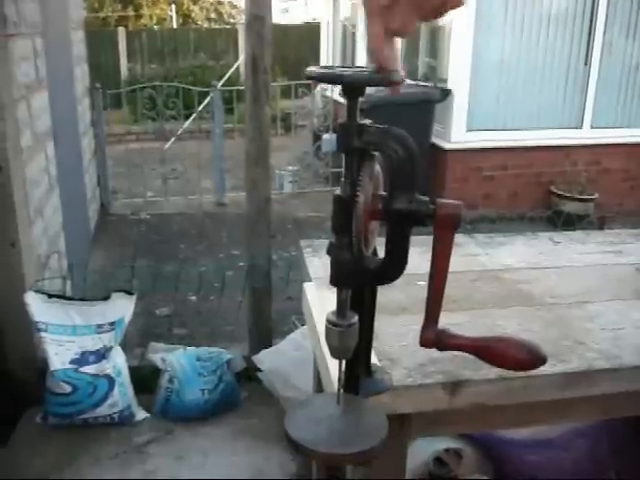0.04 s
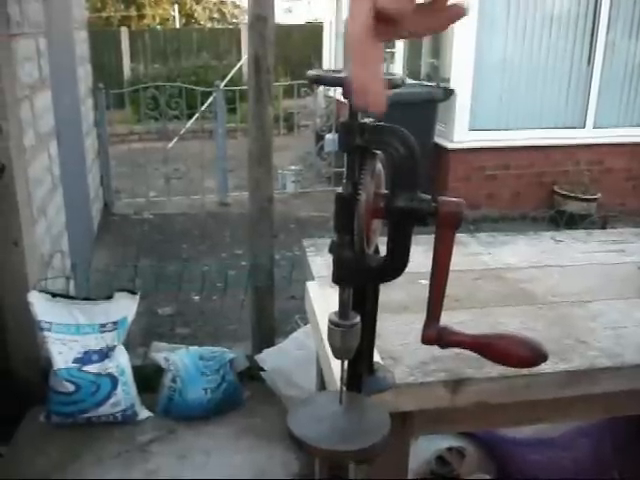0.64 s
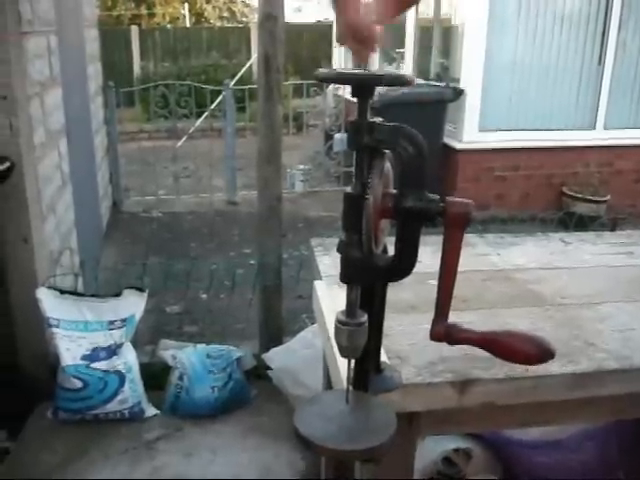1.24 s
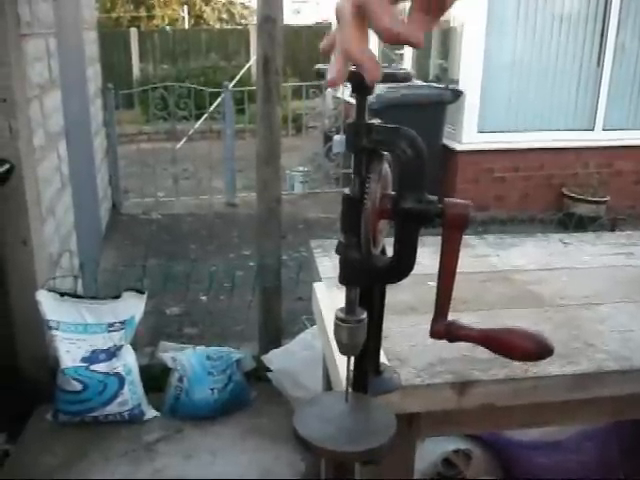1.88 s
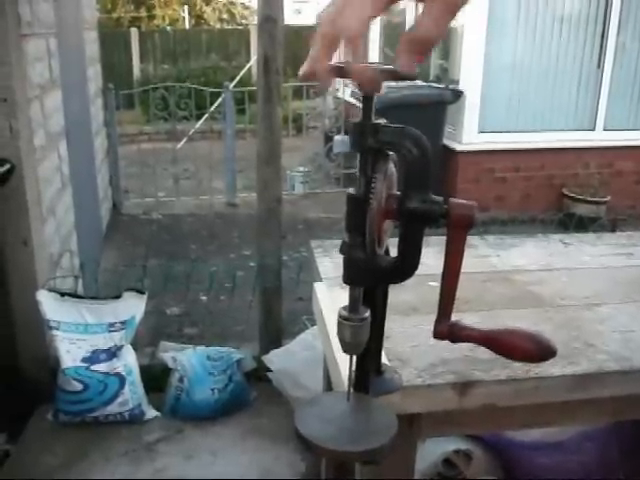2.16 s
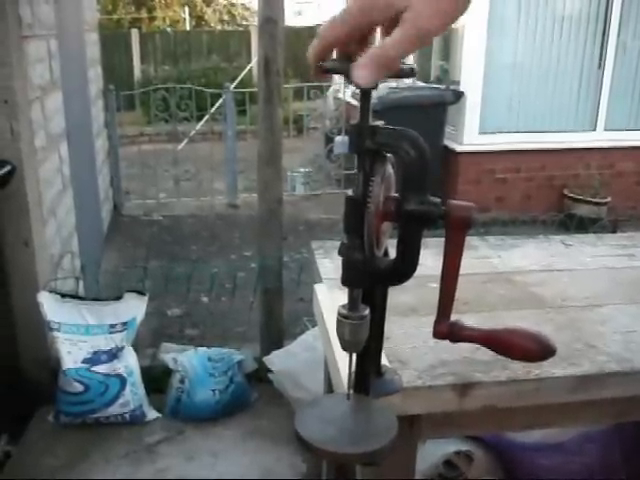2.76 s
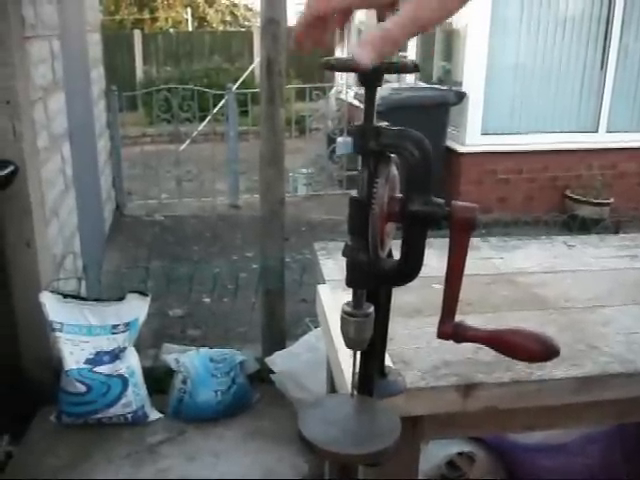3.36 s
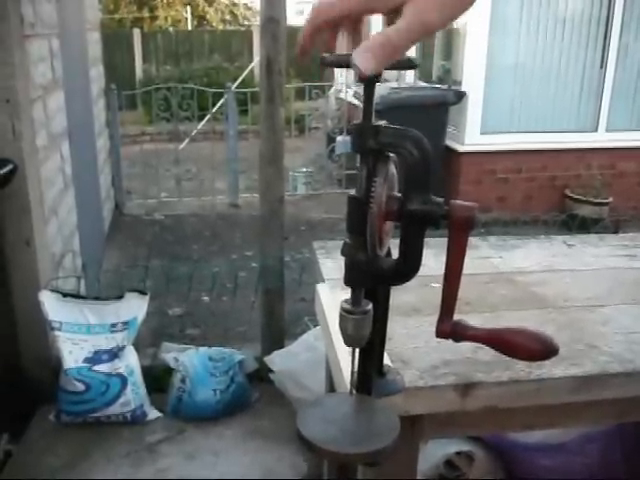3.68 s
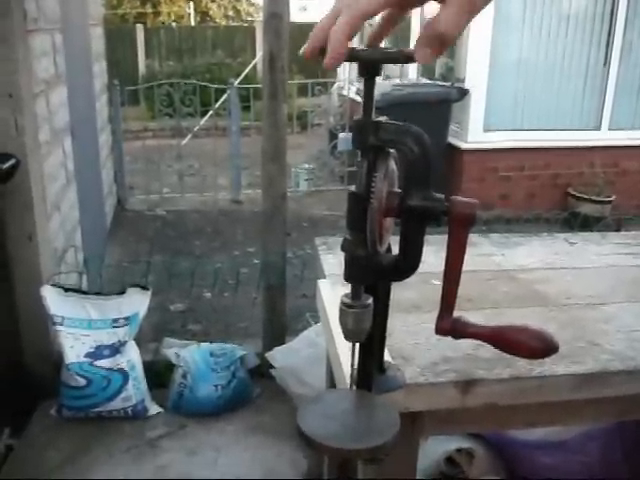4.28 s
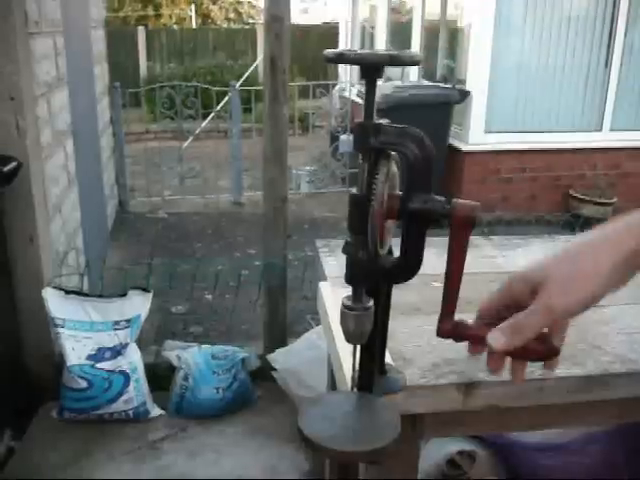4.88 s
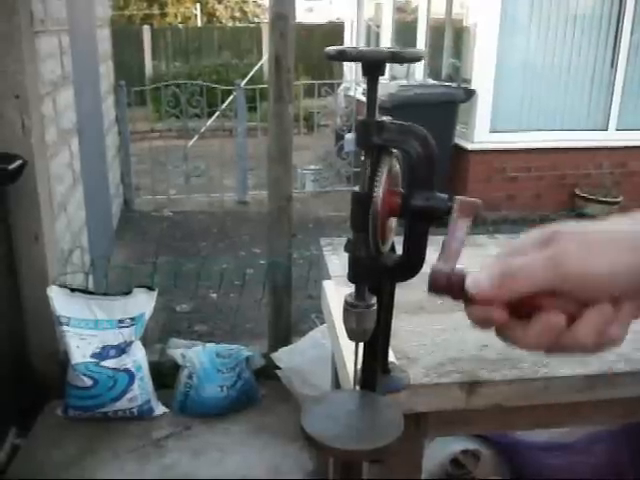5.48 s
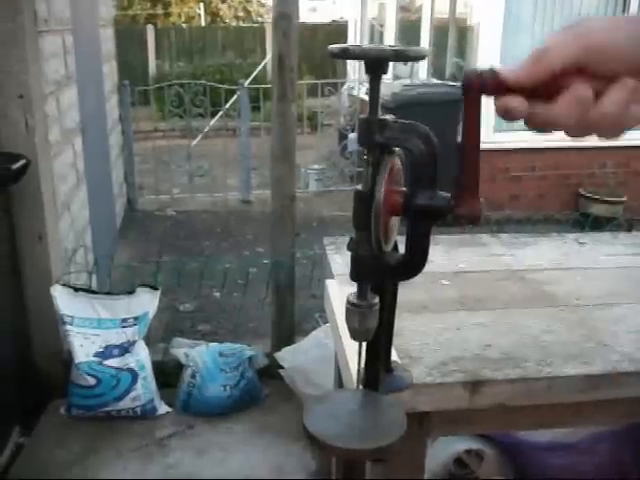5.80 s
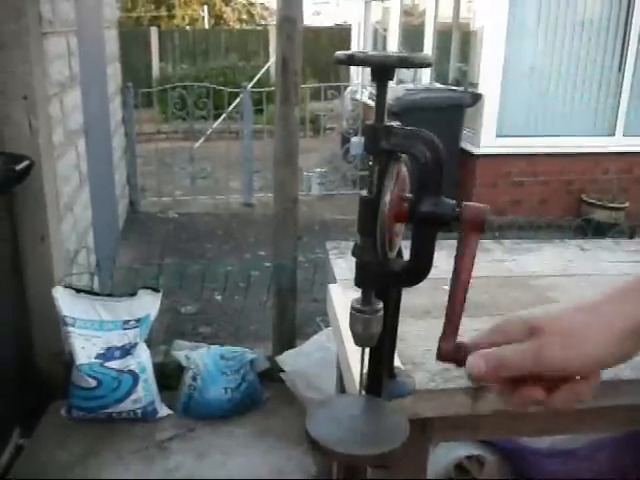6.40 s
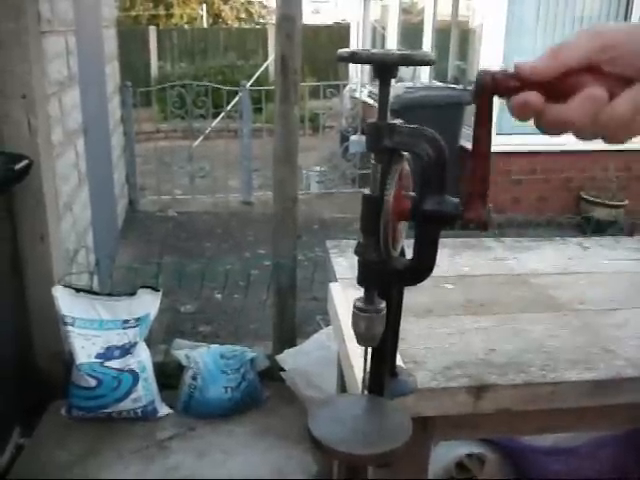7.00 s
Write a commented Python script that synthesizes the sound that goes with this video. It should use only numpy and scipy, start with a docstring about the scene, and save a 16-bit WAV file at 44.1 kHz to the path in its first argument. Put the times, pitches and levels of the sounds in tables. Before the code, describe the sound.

A hand-cranked bench drill rubs, knocks and ticks quietly, then its gears whirr, over a distant engine, traffic and hiss.

```python
"""A hand-cranked bench drill, worked in a doorway onto a patio. Fingers spin the feed wheel, whose screw
rubs and knocks in the iron frame while a steel pawl ticks; then the crank turns and the gears whirr.
Each part is a set of ringing modes, struck by single hits or a stream of tiny contacts. Behind it sit
one far engine, a wash of traffic, a low breeze and, at the end, a faint hoot. It is all heard through
a small camera with hiss and a low sample rate."""
import sys
import numpy as np
from scipy import signal
from scipy.fft import rfft, irfft
from scipy.io import wavfile

SR = 44100
rng = np.random.default_rng(int(sys.argv[2]) if len(sys.argv) > 2 else 0)


def unload_audio(sound):
    """Save the sound as a 16-bit wav file, at the path given as the first command line argument."""
    columns = np.transpose(np.atleast_2d(sound))
    # keep every value between -1 and 1, then stretch to whole-number steps
    steps = np.round(np.clip(columns, -1, 1) * 32767)
    wavfile.write(sys.argv[1], SR, steps.astype(np.int16))


N = 314874

# Finger flicks on the feed wheel. Each row: start in seconds, peak level of the rub in dB.
WHEEL_FLICKS = [(-.03, -38), (.22, -42.5), (.5, -45), (.8, -47.5), (2.12, -49), (2.35, -47), (2.72, -48.5),
                (3.65, -54), (3.95, -55)]
FLICK_RISE_S, COAST_DB_PER_S = 0.034, 29


def wheel_spin():
    """The rub's envelope: each flick brings the feed wheel up to speed, then it coasts down."""
    t = clock()
    flicks = []
    for s, db in WHEEL_FLICKS:
        attack = np.clip((t - s) / FLICK_RISE_S, 0, 1)
        coasting_s = np.maximum(t - s - FLICK_RISE_S, 0)
        flicks.append(attack * from_db(db - COAST_DB_PER_S * coasting_s))
    return np.max(flicks, axis=0)


# The ring of the cast frame. Each row: pitch in Hz, relative level in dB, t60 in seconds.
FRAME_MODES = [(197, -13, 0.045), (244, -10, 0.12), (319, -7.5, 0.076), (370, -6, 0.05), (434, -1, 0.051),
               (508, -2.5, 0.029), (630, -3, 0.058), (780.5, -1.5, 0.085), (864, -4.5, 0.043),
               (1031, 0, 0.04), (1108, 0, 0.015), (1347, -4.5, 0.022), (1750, -12, 0.036),
               (2495, -30, .012), (3000, -27, .015), (3600, -30, 0.014)]


def feed_rub():
    """The dry thread scrapes dully through the frame and drones in its lowest modes."""
    scrape = cut(ring(grains(per_s=900, spread_db=2.5), FRAME_MODES), 140, "high", order=4)
    scrape = cut(scrape, 370, "low", order=1)   # the fingers damp the higher modes
    drone = cut(rng.standard_normal(N), [185, 265], "band")
    rub = from_db(-3.0) * rms_one(scrape) + from_db(-5.0) * rms_one(drone)
    return wheel_spin() * from_db(0.64 * drift(21.8)) * rub


def contact(bass_hz, treble_hz, chatter_t60, push_db):
    """A push followed by chatter of the loose screw; softer contacts get a lower treble corner."""
    force = burst(chatter_t60)
    force[0] += from_db(push_db)
    return cut(cut(force, treble_hz, "low"), bass_hz, "high")


# Knocks of the feed screw. Each row: start in seconds, knock force in dB, its treble corner in Hz,
# thud force in dB.
SCREW_KNOCKS = [(1.2158, -24, 1795, -21), (1.273, -31, 1150, -42), (1.448, -28.5, 900, -38),
                (1.602, -31.5, 1050, -34.5), (1.675, -33, 700, -40), (1.721, -24, 1050, -30),
                (1.775, -33, 900, -38), (2.003, -28.5, 1700, -27), (2.055, -28, 1400, -50),
                (2.301, -24.5, 1384, -27.5), (2.351, -29, 1250, -41), (2.638, -33, 500, -37),
                (2.797, -30.5, 800, -38), (3.089, -36, 1300, -50), (3.127, -30.5, 1450, -40),
                (3.666, -31.5, 1450, -50)]
SETTLE_S = .011   # from knock to thud


def feed_knocks():
    """The screw knocks in its slack against the frame and settles with a dull thud."""
    force = np.zeros(N)
    for s, knock_db, treble_hz, thud_db in SCREW_KNOCKS:
        knock = contact(bass_hz=0.47 * treble_hz, treble_hz=treble_hz, chatter_t60=0.09, push_db=-3.5)
        thud = contact(bass_hz=202, treble_hz=593, chatter_t60=0.12, push_db=-6)
        add(force, s, from_db(knock_db) * knock)
        add(force, s + SETTLE_S, from_db(thud_db) * thud)
    return from_db(1.5) * ring(force, FRAME_MODES, flip=False)


# Clear ticks. Each row: start in seconds, force on the pawl in dB, force on the big wheel in dB.
PAWL_TICKS = [(0.019, -38, -34.5), (0.38, -35.5, -34), (1.2116, -36.5, -39), (1.501, -40, -40.5),
              (1.5984, -35.5, -38), (2.6835, -27.5, -37), (2.9983, -18.5, -33.5), (3.3712, -28.5, -40.5),
              (4.0455, -36.5, -51), (5.660, -35.5, -39), (6.0917, -26, -39), (6.4605, -25, -45),
              (6.4645, -29.5, -32.5), (6.5016, -29.5, -43), (6.5415, -33, -44), (6.570, -33, -47),
              (6.8916, -27, -35)]
# The bright ping of the steel pawl. Each row: pitch in Hz, relative level in dB, t60 in seconds.
PAWL_MODES = [(2680, -13, 0.074), (2770, -5, 0.016), (3200, 6, 0.013), (3450, -5, 0.0096),
              (3627, -2.5, 0.014), (3792, -1.5, 0.013), (4190, -6.5, 0.021), (4490, -2, .025)]
# The body of the big gear wheel. Each row: pitch in Hz, relative level in dB, t60 in seconds.
GEAR_MODES = [(549, -3, 0.039), (680, -1, 0.024), (738, -1, 0.052), (824, 2, 0.016), (959, -3.5, 0.045),
              (1085, -3, 0.047), (1366, -10, 0.068), (1450, -6.5, 0.023), (1780, -7.5, 0.014),
              (2390, -6, 0.0091), (2800, -26, 0.03), (3055, -15, 0.055), (3120, -11, 0.013),
              (3520, -19, 0.044), (4380, -17.5, 0.049)]


def pawl():
    """The pawl snaps over a tooth, pings and jolts the big wheel. On running gears it jingles lightly."""
    snap, jolt = np.zeros((2, N))
    for s, pawl_db, wheel_db in PAWL_TICKS:
        add(snap, s, from_db([pawl_db]))
        add(jolt, s, from_db([wheel_db]))
    jingle = from_db(TEETH_DB + 1 + cranking_db()) * grains(per_s=24, spread_db=1.5)
    # so small a part radiates no bass
    ping = cut(ring(snap + jingle, PAWL_MODES, flip=False), [2660, 3980], "band")
    thud = cut(ring(jolt, GEAR_MODES, flip=False), [550, 2100], "band")
    return doorway(from_db(3.5) * ping + from_db(6.5) * thud, tail_db=0.3, tail_t60=0.071)


CRANK_START_S, CRANK_FADE_IN_S = 5.12, .3
CRANK_TOP_S, CRANK_RISE_DB_PER_S, CRANK_FALL_DB_PER_S = 6.487, 9, 16.5


def cranking_db():
    """Level of the running gears against their top: the hand sets off, gathers speed and slows."""
    t = clock()
    setting_off = np.clip((t - CRANK_START_S) / CRANK_FADE_IN_S, 1e-4, 1)
    rising_db = CRANK_RISE_DB_PER_S * (t - CRANK_TOP_S)
    falling_db = CRANK_FALL_DB_PER_S * (CRANK_TOP_S - t)
    return 20 * np.log10(setting_off) + np.minimum(rising_db, falling_db)


# The gears bind twice near full speed. Each row: centre in seconds, teeth boost in dB, bearing boost in dB.
GEAR_BINDS = [(6.022, 9, 5), (6.42, 4.5, 8)]
TEETH_DB, BEARING_DB = -43, -48.5   # at full speed, before the boosts


def gears():
    """Rough teeth rattle the big wheel and sizzle; the bearing rumbles under load. Binds swell both."""
    teeth_db = TEETH_DB + cranking_db()
    bearing_db = BEARING_DB + cranking_db()
    for s, teeth_boost_db, bearing_boost_db in GEAR_BINDS:
        teeth_db += teeth_boost_db * swell(s, half_width_s=0.042)
        bearing_db += bearing_boost_db * swell(s, half_width_s=0.03)
    whirr = rms_one(cut(ring(grains(per_s=740, spread_db=5), GEAR_MODES), 410, "high"))
    sizzle = rms_one(cut(grains(per_s=350, spread_db=12.0), [3080, 3680], "band"))
    teeth = whirr + from_db(-17.0) * sizzle
    bearing = rms_one(cut(rng.standard_normal(N), [200, 420], "band"))
    return from_db(teeth_db + 1.4 * drift(25)) * teeth + from_db(bearing_db) * bearing


# The direct path and the doorway's bounces. Each row: delay in seconds, relative level in dB.
DOORWAY_PATHS = [(0, -8), (.00179, -7), (.00532, 0), (.00885, -11)]


def doorway(x, tail_db, tail_t60):
    """A tight space: a few close reflections and a short scatter."""
    response = from_db(tail_db) * burst(tail_t60)
    for delay, db in DOORWAY_PATHS:
        add(response, delay, from_db([db]))
    return signal.fftconvolve(x, response / np.sqrt(np.sum(response ** 2)))[:N]


# The engine pulls away, eases off and gathers speed again.
# Each row: time in seconds, firing rate in Hz, overall gain in dB.
ENGINE_CURVE = [(0, 29.8, -40), (.75, 29.63, -46.5), (1.19, 42.8, -42), (1.8, 42.16, -39.5),
                (2.3, 41.6, -44), (2.75, 41.1, -53.5), (3.6, 37.98, -49), (4.25, 36.37, -54),
                (5.2, 41.67, -50), (5.9, 44.8, -48.5), (6.25, 46.1, -49), (7.14, 45.74, -51)]
# Its tone: the relative level in dB of each of the first four firing orders.
ENGINE_ORDERS_DB = [-4, -7.5, -17, -20.5]


def engine(waver_db):
    """A far engine drones: only its lowest firing orders carry, each wavering in level."""
    firing_hz, gain_db = in_time(ENGINE_CURVE)
    phase = 2 * np.pi * np.cumsum(firing_hz) / SR
    drone = 0
    for order, db in enumerate(ENGINE_ORDERS_DB, start=1):
        level = from_db(db + waver_db * drift(6))
        drone += level * np.sin(order * phase + 2 * np.pi * rng.random())
    return from_db(gain_db) * np.sqrt(2) * drone


# The colour of the traffic. Each row: frequency in Hz, relative spectral density in dB.
TRAFFIC_SPECTRUM = [(20, -26), (40, -5), (65, -12), (100, -28), (140, -19), (190, -12), (245, -7.5),
                    (380, -14.5), (560, -8.5), (750, -9.5), (1000, -13), (1250, -20), (2000, -29.5),
                    (3500, -35.5)]
# Its fader. Each row: time in seconds, level in dB.
TRAFFIC_LEVEL = [(0, -45), (5.2, -46.5), (7.14, -47)]


def traffic():
    """Distant traffic blends into a dark, slightly wavering wash."""
    level_db, = in_time(TRAFFIC_LEVEL)
    return from_db(level_db + 0.58 * drift(8.3)) * noise(TRAFFIC_SPECTRUM)


# The breeze dies down. Each row: time in seconds, level in dB.
BREEZE_LEVEL = [(0, -43.5), (.9, -46), (1.3, -46.5), (2.6, -50), (7.14, -53)]


def breeze():
    """Moving air makes a deep rumble."""
    level_db, = in_time(BREEZE_LEVEL)
    rumble = cut(cut(rng.standard_normal(N), 75.4, "low"), 23.5, "high")
    return from_db(level_db) * rms_one(rumble)


def hoot(start_s, rise_s, hz, glide_hz_per_s, db):
    """A faint, far tone fades in and glides slowly upwards."""
    since = np.maximum(clock() - start_s, 0)
    phase = 2 * np.pi * np.cumsum(hz + glide_hz_per_s * since) / SR
    return from_db(db) * np.minimum(since / rise_s, 1) * np.sqrt(2) * np.sin(phase)


def ring(force, modes, flip=True):
    """One force rings a body's modes in alternating polarity; flip=False gives a sharper attack."""
    out = 0
    for k, (hz, db, t60) in enumerate(modes):
        decay = from_db(-60 / (t60 * SR))
        angle = 2 * np.pi * hz / SR
        sign = -1 if flip and k % 2 else 1
        feedback = [1, -2 * decay * np.cos(angle), decay * decay]
        out += sign * from_db(db) * signal.lfilter([0, np.sin(angle)], feedback, force + 1e-18)
    return out / np.sqrt(sum(from_db(db) ** 2 for hz, db, t60 in modes))


def grains(per_s, spread_db):
    """Tiny contacts at random moments, of uneven size."""
    sizes = from_db(spread_db * np.clip(rng.standard_normal(N), -2, 2)) * rng.choice([-1, 1], N)
    return sizes * (rng.random(N) < per_s / SR)


def burst(t60):
    """A sixth of a second of dying noise, unit energy."""
    t = np.arange(SR // 6) / SR
    x = rng.standard_normal(len(t)) * from_db(-60 * t / t60)
    return x / np.sqrt(np.sum(x ** 2))


def noise(spectrum):
    """Noise with the given colour, unit rms."""
    hz, db = np.transpose(spectrum)
    bins = np.maximum(np.fft.rfftfreq(N, 1 / SR), 1)
    colour = from_db(np.interp(np.log(bins), np.log(hz), db))
    return rms_one(irfft(rfft(rng.standard_normal(N)) * colour, N))


def drift(per_s):
    """A random wander through points with a spread of 1."""
    knots = rng.standard_normal(2000)
    return np.interp(clock() * per_s, np.arange(len(knots)), knots)


def swell(s, half_width_s):
    """A bell-shaped rise to 1 around time s."""
    return np.exp(-.5 * ((clock() - s) / half_width_s) ** 2)


def cut(x, hz, kind, order=2):
    """Butterworth filter."""
    sections = signal.butter(order, np.clip(hz, 10, .45 * SR), kind, fs=SR, output="sos")
    return signal.sosfilt(sections, x)


def add(out, s, x):
    """Mix x into out from time s."""
    at = max(round(s * SR), 0)
    out[at:at + len(x)] += x[:N - at]


def in_time(rows):
    """The columns of a curve, one value a sample."""
    s, *columns = np.transpose(rows)
    return [np.interp(clock(), s, column) for column in columns]


def clock():
    """Time in seconds, one value a sample."""
    return np.arange(N) / SR


def from_db(db):
    """Decibels to gain."""
    return 10 ** (np.asarray(db) / 20)


def rms_one(x):
    """Scale to unit rms."""
    return x / np.sqrt(np.mean(x ** 2) + 1e-20)


def scene():
    """The drill close by, the neighbourhood behind it, in mono."""
    drill = pawl() + feed_knocks() + feed_rub() + gears()
    outdoors = engine(waver_db=1.0) + traffic() + breeze()
    outdoors += hoot(start_s=6.95, rise_s=0.067, hz=550, glide_hz_per_s=86, db=-49)
    return (drill + outdoors)[None]


HOLD_SAMPLES, CUTOFF_HZ, DC_OFFSET = 4, 12620, -.041


def record(dry):
    """The camera hisses and holds every fourth sample, mirroring sound into the treble; its zero is low."""
    converter_hiss = from_db(-54) * rng.standard_normal(dry.shape)
    microphone_hiss = from_db(-48.0) * cut(rng.standard_normal(dry.shape), 3070, "low")
    heard = cut(dry, 5240, "low", order=6) + converter_hiss + microphone_hiss
    held = np.repeat(heard[:, ::HOLD_SAMPLES], HOLD_SAMPLES, axis=1)[:, :N]
    steep_lowpass = signal.ellip(12, .1, 90, CUTOFF_HZ, fs=SR, output="sos")
    return signal.sosfilt(steep_lowpass, held) + DC_OFFSET


dry = scene()
out = record(dry)
unload_audio(out)
```